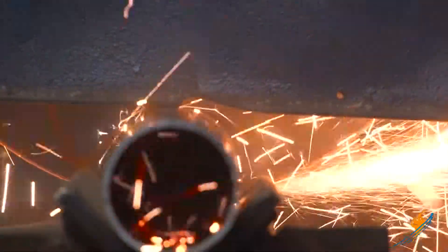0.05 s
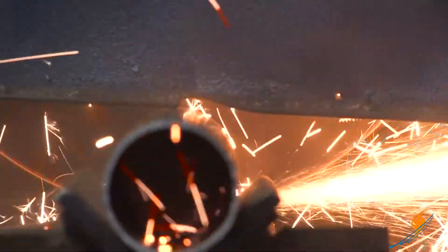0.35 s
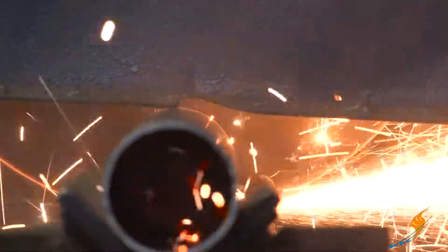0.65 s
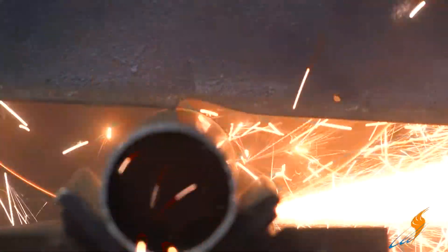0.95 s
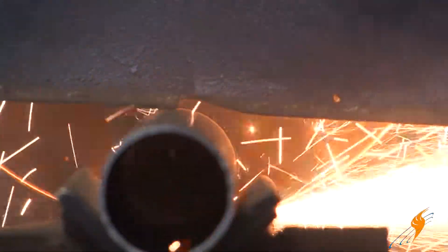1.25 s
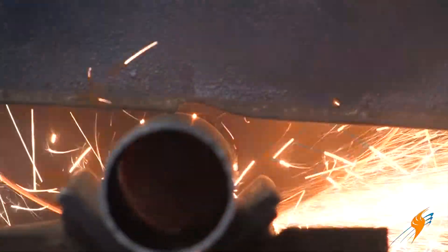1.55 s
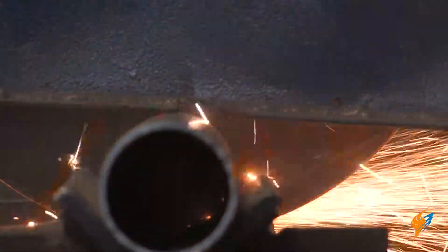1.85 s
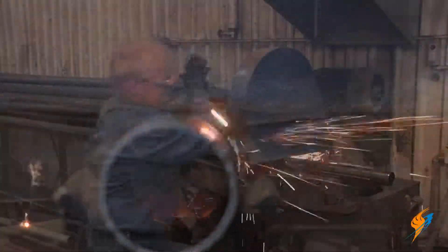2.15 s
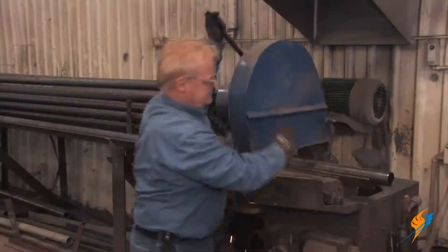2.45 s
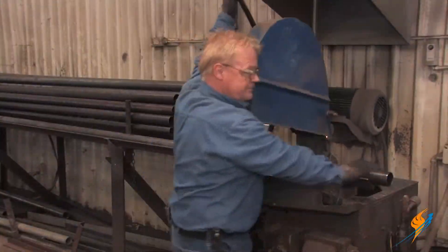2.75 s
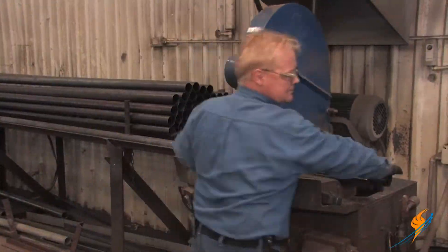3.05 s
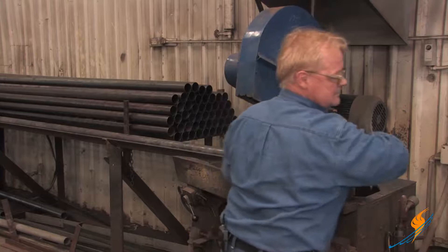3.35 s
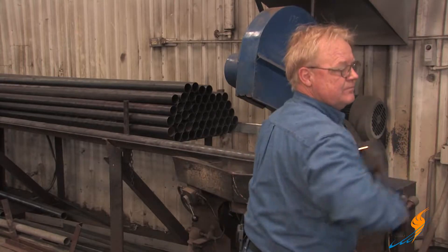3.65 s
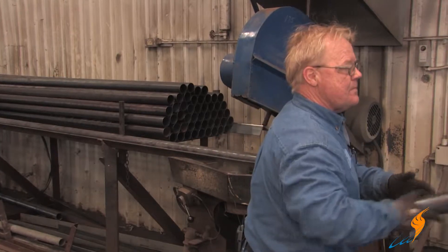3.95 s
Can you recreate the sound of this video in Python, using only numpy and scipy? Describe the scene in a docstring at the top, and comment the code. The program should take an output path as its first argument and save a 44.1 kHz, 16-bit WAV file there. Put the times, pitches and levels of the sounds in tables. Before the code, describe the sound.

A cut-off saw grinds loudly through a steel tube from the start, a close, buzzing roar with hiss. It growls around 1 second, then throbs and squeals from 1.5 until the cut ends at 2.3. The motor keeps whining more quietly to the end. The tube clanks and bounces on the steel bed at 2.4 and again at 3.2 seconds, with light scrapes and a short workshop echo.

```python
"""A roar with a fine buzz: an abrasive cut-off wheel grinds through a steel tube, its grit passing
again on every turn. The tube growls in mid-cut; the wheel throbs and sings as it breaks through.
The motor whines on while the tube is slid and knocked twice, with bounces, against the saw's
steel bed. The cut echoes in a hard-walled workshop."""
import sys
import numpy as np
from scipy import signal
from scipy.fft import rfft, irfft
from scipy.io import wavfile
from scipy.ndimage import uniform_filter1d, map_coordinates

SR = 44100
rng = np.random.default_rng(int(sys.argv[2]) if len(sys.argv) > 2 else 0)


def persist_wave(psi):
    """Save psi, clipped to +-1, as 16-bit WAV."""
    counts = np.round(np.clip(psi, -1, 1) * 32767).astype(np.int16)
    wavfile.write(sys.argv[1], SR, np.atleast_2d(counts).T)


N = 176400

# Wheel speed. Each row: time in seconds, turns per second.
WHEEL_TURNS_PER_S = [(0, 36.38), (.8, 36.36), (1.0, 36.6), (1.3, 36.65), (1.55, 37.25), (1.9, 37.42),
                     (2.4, 37.4)]
# Throb from the wheel's wobble. Each row: time in seconds, nominal swing of the bite in dB.
THROB_DB = [(0, 0), (1.0, 0), (1.3, 2), (1.55, 1), (1.85, 4), (2.05, 2.5), (2.15, 2.5), (2.3, 1.5)]
# The wheel loses or catches its bite. Each row: centre in seconds, half-width in seconds, change in dB.
SKIPS = [(1.667, .005, -6), (1.794, 0.0098, -8), (1.809, .005, 2.5)]

# Envelopes of the cut. Each row: time in seconds, relative level in dB.
RASP_ENV_DB = [(0.0, -20), (0.2, -22.5), (0.48, -20), (1.06, -26.5), (1.54, -29.5), (1.63, -33.5),
               (1.75, -29.5), (1.8, -37), (1.81, -28), (1.85, -36), (2.25, -34), (2.3, -39)]  # mids
HISS_ENV_DB = [(0.0, -18), (0.42, -23), (0.67, -22), (1.46, -33.5), (1.54, -25.5), (1.63, -32.5),
               (1.69, -26.5), (1.72, -37), (1.74, -31.5), (1.8, -35), (1.81, -31.5), (2.3, -32.5)]  # treble
GROWL_ENV_DB = [(0, -28), (.7, -30.5), (.85, -23.5), (1.0, -22), (1.29, -26), (1.39, -21.5), (1.44, -24.5),
                (1.5, -23.5), (1.58, -26), (1.65, -32.5), (2.0, -43), (2.3, -60)]  # tube
RUMBLE_ENV_DB = [(0.0, -35), (0.91, -40), (0.94, -55), (1.47, -53), (1.52, -43), (2.18, -57), (2.25, -44),
                 (2.3, -63)]  # spark jet
SING_ENV_DB = [(0, -49), (.9, -51), (1.45, -43.5), (1.55, -29.5), (1.65, -36.5), (2.05, -35.5),
               (2.26, -32.5)]  # steel under the wheel
SHRIEK_ENV_DB = [(0, -45), (.2, -29), (.5, -26), (.7, -28), (1.1, -32.5), (1.6, -35)]  # hardest bite
SQUEAL_ENV_DB = [(0, -61), (1.5, -42), (1.7, -39.5), (1.92, -36.5), (2.08, -37), (2.2, -40)]  # thin last wall
# Spectra of the cut. Each row: frequency in Hz, relative level in dB.
RASP_SPECTRUM = [(70, -5.5), (160, -5.5), (300, -2.5), (430, 4), (620, -3.5), (930, 0.5), (1130, -3),
                 (1500, 3), (1800, 0.5), (2200, 0.5), (2450, -2), (2900, -1), (3400, -7), (4500, -8)]
HISS_SPECTRUM = [(2300, -5), (3400, 0), (3900, 1.5), (4600, -0.5), (5200, 0.5), (5900, 4), (6600, 0.5),
                 (7700, -2), (8900, 0), (9500, -3.5), (10400, -4), (11300, -1.5), (12500, -4),
                 (14000, -4.5), (15600, -10.5)]
GROWL_SPECTRUM = [(70, -40), (140, -14), (180, -4.5), (215, -1.5), (255, 1), (320, -9.5), (390, -7),
                  (440, 0.5), (520, -6.5), (590, -8.5), (900, -12), (1400, -22.5)]
RUMBLE_SPECTRUM = [(15, -23), (35, 5.5), (90, 2), (150, 6.5), (300, -22)]
# Resonances of the cut. Each row: frequency in Hz, width in Hz, relative level in dB.
SING_PEAKS = [(1240, 26, 0), (1437, 75, 7), (1720, 76, 3.5), (2103, 78, 8), (3850, 100, 6.5),
              (4680, 85, -4), (7050, 65, 4), (9840, 85, 0)]
SHRIEK_PEAKS = [(10910, 190, -8.5), (11350, 1600, -14)]
# Note of the tube wall. Each row: time in seconds, pitch in Hz, level in dB.
WALL_NOTE = [(.2, 1710, -42), (.42, 1850, -27), (.62, 1845, -42), (1.05, 1500, -45), (1.22, 1563, -32),
             (1.49, 1679, -35), (1.555, 1815, -26), (1.62, 1824, -42), (2.0, 1710, -40), (2.18, 1790, -38),
             (2.255, 1837, -31), (2.3, 1840, -40)]
# Squeals of the thin last wall. Each row: frequency in Hz, relative level in dB.
SQUEAL_TONES = [(4590, -4), (5700, -2.5), (10830, -13)]
# Steel tones flare. Each row: centre in seconds, half-width in seconds, frequency in Hz, level in dB.
FLARES = [(.08, 0.22, 2185, -29.5), (.08, .2, 2870, -29), (0.123, 0.19, 6150, -34),
          (0.244, 0.07, 4284, -31), (.33, 0.28, 1488, -28.5), (0.303, 0.093, 11050, -24.5),
          (0.45, .04, 11030, -25.5), (.9, .4, 1489, -36), (.53, .15, 2264, -31), (1.678, .014, 5700, -33),
          (1.69, .012, 10850, -30), (1.762, 0.011, 10830, -30), (1.809, 0.01, 5670, -32),
          (1.996, 0.01, 10830, -28), (2.057, 0.0095, 10690, -31)]
# Rim lumps drum. Each row: harmonic of the turn, centre in seconds, half-width in seconds, level in dB.
RIM_LUMPS = [(7, 0.71, 0.29, -31.5), (6, .98, 0.039, -22.5), (6, 1.3, 0.031, -23.5), (6, 1.215, 0.028, -28),
             (14, 1.08, 0.18, -25), (7, 1.395, 0.04, -26.5), (6, 1.5, 0.028, -21)]

# Motor partials. Each row: frequency in Hz, base level in dB.
WHINE_TONES = [(538.3, -45.5), (1077, -59), (1380, -57)]
# Whine envelope. Each row: time in seconds, gain in dB.
WHINE_ENV_DB = [(2.25, 8), (2.75, 4.5), (4, 1)]
# Free-running wheel. Each row: frequency in Hz, relative level in dB.
IDLE_SPECTRUM = [(30, -27), (80, -12.5), (200, 1.5), (300, -0.5), (620, -2), (1200, -6), (2240, -11),
                 (3800, -19.5), (7800, -25), (15500, -30)]

# Tube scuffs. Each row: centre in seconds, sigma in seconds, level in dB, frequency in Hz, width in Hz.
SCRAPES = [(2.35, 0.042, -33, 267.5, 203), (3.087, 0.042, -33.5, 206.6, 50), (3.1, 0.11, -46, 770, 1120),
           (3.142, 0.013, -43, 9300, 12100), (3.311, 0.0065, -35.5, 9900, 8000)]
# Blows. Each row: start in seconds, gain in dB, place from 0 (vise) to 1 (end), tilt in dB per octave.
KNOCKS = [(2.408, 0.5, 0.015, -1.17), (2.445, -3, 0.06, -4), (2.485, -7, 0.15, -1), (2.6, -13.5, 0, -3.5),
          (3.201, -1, 0.88, -0.5), (3.252, -7.5, 0.67, -3), (3.325, -7, 1, -2.5), (3.452, -15.5, 1, -1.5)]
# Tube and bed modes. Each row: frequency in Hz, T60 in seconds, relative dB struck at vise, at end.
TUBE_MODES = [(150.4, 1, -19, -10.5), (206.3, 0.91, -7.5, -3.5), (248.2, 0.36, -6, 5), (272.3, 0.63, -4, 1),
              (334, 0.21, 6, -17), (389.2, 0.63, 1.5, -8), (428, 0.49, 4, -13), (513, 0.56, -5, -8),
              (802, 1, -9, -12), (888, 0.44, -6, -4.5), (962, 0.56, -8, -7.5), (1240, 0.52, -11, -18)]
# Frame and room clatter. Each row: frequency in Hz, relative dB per half-octave band, T60 in seconds.
CLATTER_BANDS = [(45, -27, 0.22), (101, -26, 0.51), (195, -3.5, 0.63), (402, -8, 1), (910, -3, 0.7),
                 (1820, -7, 0.56), (3440, -14.5, 0.66), (6840, -18.5, 0.6), (14000, -10.5, 0.31)]

RASP_REPEAT, HISS_REPEAT, GROWL_REPEAT = 0.66, 0.44, 0.31  # share of grit power from the rim


def undb(db):
    """Decibels to gain."""
    return 10 ** (np.asarray(db) / 20)


def unit(x):
    """Scale to rms 1."""
    return x / (np.std(x) + 1e-12)


def noise():
    """White noise."""
    return rng.standard_normal(N)


def clock():
    """Sample times in seconds."""
    return np.arange(N) / SR


def curve(rows):
    """Join (seconds, value) points with straight lines."""
    return np.interp(clock(), *np.array(rows, float).T)


def bump(at_s, half_s):
    """Gaussian swell, 1/e at half_s from its centre."""
    return np.exp(-((clock() - at_s) / half_s) ** 2)


def decay(t, t60_s):
    """Fall of 60 dB per t60_s."""
    return np.exp(-np.log(1000) * t / t60_s)


def bins_hz():
    """FFT bin frequencies, floored at 1 Hz."""
    return np.maximum(np.arange(N // 2 + 1) * SR / N, 1)


def colour(x, spectrum):
    """Filter by (Hz, dB) points, rolling off beyond the ends; rms 1."""
    hz, db = np.array(spectrum, float).T
    f = bins_hz()
    rolloff = np.minimum(1, np.minimum(f / hz[0], hz[-1] / f)) ** 2
    gain = undb(np.interp(np.log(f), np.log(hz), db))
    return unit(irfft(rfft(x) * rolloff * gain, N))


def resonate(x, peaks, order=1):
    """Filter by parallel (Hz, width Hz, dB) resonances; rms 1."""
    f = bins_hz()
    response = sum(undb(db) / (1 + 1j * (f * f - hz * hz) / (f * width_hz)) ** order
                   for hz, width_hz, db in peaks)
    return unit(irfft(rfft(x) * response, N))


def drift(rate_hz):
    """Smooth random signal; rms near 1."""
    span = int(SR / rate_hz)
    return unit(uniform_filter1d(uniform_filter1d(noise(), span), span))


def wheel_bite_db(turns, high_spot_s=2.001):
    """The wobbling wheel presses harder once a turn, skips and flutters."""
    phase = 2 * np.pi * (turns - np.interp(high_spot_s, clock(), turns))
    wobble = curve(THROB_DB) * (1 + drift(28) / 2) * np.cos(phase + 0.34 * drift(20))
    skips = sum(db * bump(at_s, half_s) for at_s, half_s, db in SKIPS)
    return wobble + skips + 0.4 * drift(110)


def grit(turns, repeat, points_per_turn=1210, kept_per_turn=0.92):
    """Rim roughness, met again each turn as it wears, plus fresh fracture noise."""
    rim = rng.standard_normal((200, points_per_turn))  # one row per turn
    worn = signal.lfilter([1], [1, -kept_per_turn], rim, axis=0)[40:].ravel()
    passing = unit(map_coordinates(worn, [turns * points_per_turn], order=3, mode="wrap"))
    return np.sqrt(repeat) * passing + np.sqrt(1 - repeat) * noise()


def wall_note(width_hz=480):
    """Grit excites the tube wall; its rough note rises as the wheel digs in or breaks through."""
    hz, db = (curve(np.array(WALL_NOTE)[:, [0, column]]) for column in (1, 2))
    phase = 2 * np.pi * np.cumsum(hz) / SR
    return undb(db) * (drift(width_hz) * np.sin(phase) + drift(width_hz) * np.cos(phase))


def squeal(hz):
    """Self-excited steel tone; pitch and level flutter, less so for low tones."""
    flutter = min(hz / 5200, 1)
    jitter_rad = 1.17 * flutter * (drift(160) + drift(38))
    flicker_db = 3 * flutter * drift(72)
    return np.sqrt(2) * np.sin(2 * np.pi * hz * clock() + jitter_rad) * undb(flicker_db)


def rim_lumps(turns):
    """Lumps on the rim drum on the tube, surging as its resonances shift with the cut."""
    out = np.zeros(N)
    for harmonic, at_s, half_s, db in RIM_LUMPS:
        surge = np.sqrt(2) * undb(db + 1.9 * drift(35)) * bump(at_s, half_s)
        out += surge * np.sin(2 * np.pi * harmonic * turns + .5 * drift(29))
    return out


def cut(end_s=2.319, release_db_per_s=383):
    """Grit tears the steel: mids and treble throb with the bite, over a growl and spark-jet rumble."""
    turns = np.cumsum(curve(WHEEL_TURNS_PER_S)) / SR
    bite_db = wheel_bite_db(turns)
    rasp = colour(grit(turns, RASP_REPEAT), RASP_SPECTRUM)
    rasp *= undb(curve(RASP_ENV_DB) + 1 + 0.31 * bite_db)
    hiss = colour(grit(turns, HISS_REPEAT), HISS_SPECTRUM)
    hiss *= undb(curve(HISS_ENV_DB) + 0.5 + 0.79 * bite_db)
    wall = wall_note() * undb(bite_db / 2)
    sing = resonate(grit(turns, HISS_REPEAT), SING_PEAKS) * undb(curve(SING_ENV_DB) + bite_db)
    squeals = sum(squeal(hz) * undb(db) for hz, db in SQUEAL_TONES)
    squeals *= undb(curve(SQUEAL_ENV_DB) + 1.5 * bite_db)
    shriek = resonate(noise(), SHRIEK_PEAKS, order=2) * undb(curve(SHRIEK_ENV_DB) + bite_db)
    lumps = rim_lumps(turns)
    flares = sum(squeal(hz) * undb(db) * bump(at_s, half_s) for at_s, half_s, hz, db in FLARES)
    growl = colour(grit(turns, GROWL_REPEAT), GROWL_SPECTRUM) * undb(curve(GROWL_ENV_DB) + 1)
    rumble = colour(noise(), RUMBLE_SPECTRUM) * undb(curve(RUMBLE_ENV_DB) + 0.5)
    contact = undb(-release_db_per_s * np.maximum(clock() - end_s, 0))
    return contact * (rasp + hiss + wall + sing + squeals + shriek + lumps + flares + growl + rumble)


def room(x, echo_db=-14.5, t60_s=.5):
    """Add the short, diffuse echo of the workshop walls."""
    tail = rng.standard_normal(SR) * decay(np.arange(SR) / SR, t60_s)
    return x + undb(echo_db) * signal.fftconvolve(x, tail / np.linalg.norm(tail))[:N]


def motor(rush_db=-37.5):
    """Slightly wavering whine over the rush of the spinning wheel."""
    whine = np.zeros(N)
    for hz, db in WHINE_TONES:
        gain = np.sqrt(2) * undb(db + 0.5 * drift(17))
        whine += gain * np.sin(2 * np.pi * hz * clock() + 0.14 * drift(36))
    rush = colour(noise(), IDLE_SPECTRUM) * undb(rush_db + 0.19 * drift(24))
    return whine * undb(curve(WHINE_ENV_DB)) + rush


def scrapes():
    """Swells of friction as the tube slides on its rest."""
    out = np.zeros(N)
    for at_s, sigma_s, db, hz, width_hz in SCRAPES:
        friction = resonate(noise(), [(hz, width_hz, 0)], order=2)
        out += friction * undb(db) * bump(at_s, np.sqrt(2) * sigma_s)
    return out


def tube_ring(t, place, gain_db=-16.5):
    """Low modes of tube and bed, weighted by the place struck."""
    out = np.zeros(len(t))
    for hz, t60_s, vise_db, end_db in TUBE_MODES:
        gain = undb(gain_db + vise_db + place * (end_db - vise_db))
        detuned_hz = hz * (1 + 0.00726 * rng.standard_normal())
        out += gain * np.sin(2 * np.pi * (detuned_hz * t + rng.random())) * decay(t, t60_s)
    return out


def clatter(t, tilt_db_per_oct, gain_db=-17):
    """Dense ringing of frame and room: half-octave noise bands, the mids lasting longest."""
    out = np.zeros(len(t))
    band_hz, *columns = np.array(CLATTER_BANDS, float).T
    for hz in 45 * 2 ** np.arange(0, 8.6, .5):
        db, t60_s = (np.interp(np.log(hz), np.log(band_hz), column) for column in columns)
        bandpass = signal.butter(2, [hz / 2 ** .25, hz * 2 ** .25], "band", fs=SR, output="sos")
        band = unit(signal.sosfilt(bandpass, rng.standard_normal(len(t)))) / np.sqrt(2)
        out += band * undb(gain_db + db + tilt_db_per_oct * np.log2(hz / 500)) * decay(t, t60_s)
    return out


def knocks(rise_s=0.0026):
    """The tube strikes the bed; each blow rings and clatters."""
    out, t = np.zeros(N), np.arange(SR) / SR
    attack = np.minimum(t / rise_s, 1)
    for start_s, db, place, tilt_db_per_oct in KNOCKS:
        blow = tube_ring(t, place) + clatter(t, tilt_db_per_oct)
        start = int(start_s * SR)
        out[start:start + SR] += (undb(db) * blow * attack)[:N - start]
    return out


def overload(x, ceiling=.3):
    """Saturation flattens and thickens the loud knocks; the treble passes."""
    low = signal.sosfilt(signal.butter(1, 2000, fs=SR, output="sos"), x)
    excess = low - ceiling * np.tanh(low / ceiling)
    return x - signal.sosfiltfilt(signal.butter(2, 2500, fs=SR, output="sos"), excess)


def scene():
    """The close cut, then the tube handled over the idling saw; both channels alike."""
    mono = room(cut()) + overload(knocks() + scrapes() + motor())
    return np.tile(mono, (2, 1))


def record(dry):
    """Steep low-pass at 15750 Hz."""
    return signal.sosfilt(signal.ellip(10, .2, 80, 15750, fs=SR, output="sos"), dry)


dry = scene()
out = record(dry)
persist_wave(out)
```